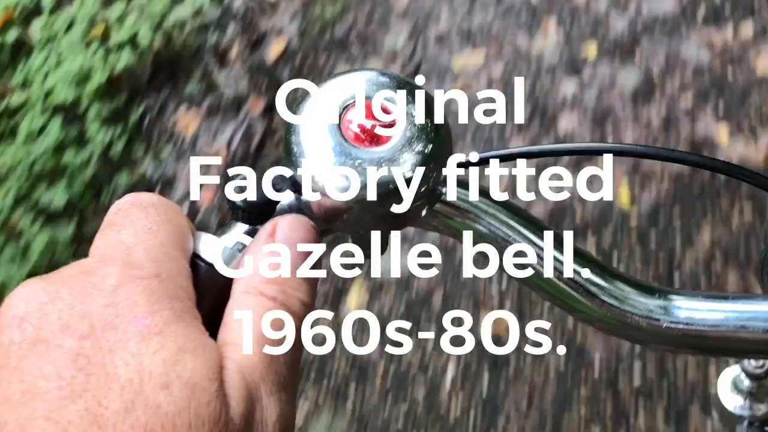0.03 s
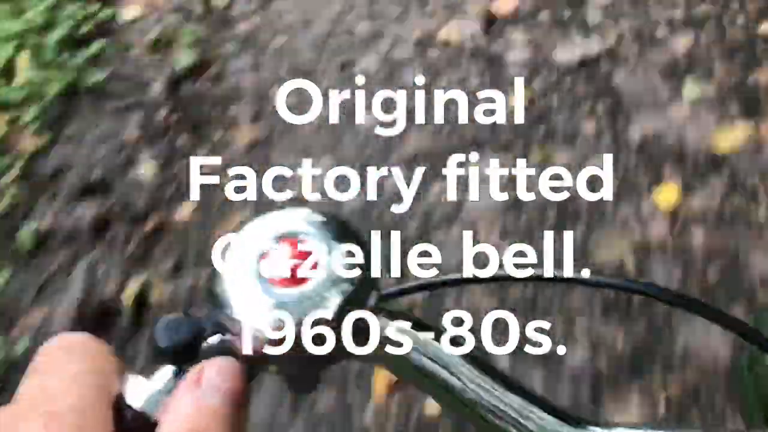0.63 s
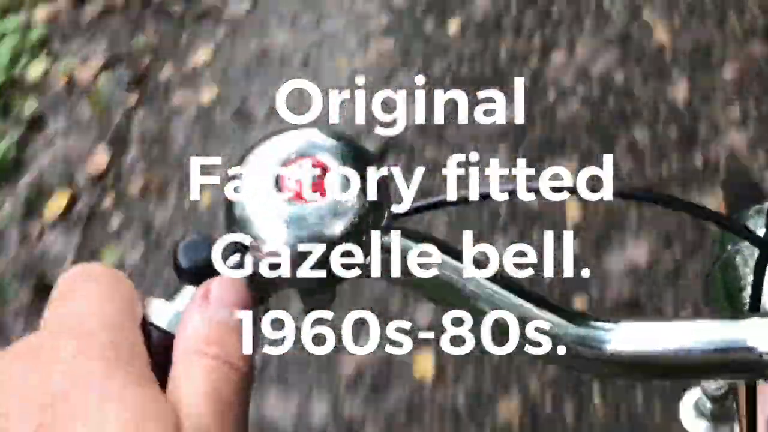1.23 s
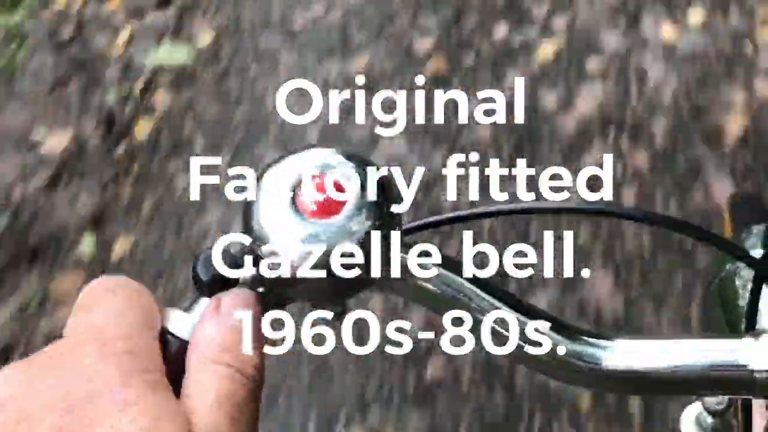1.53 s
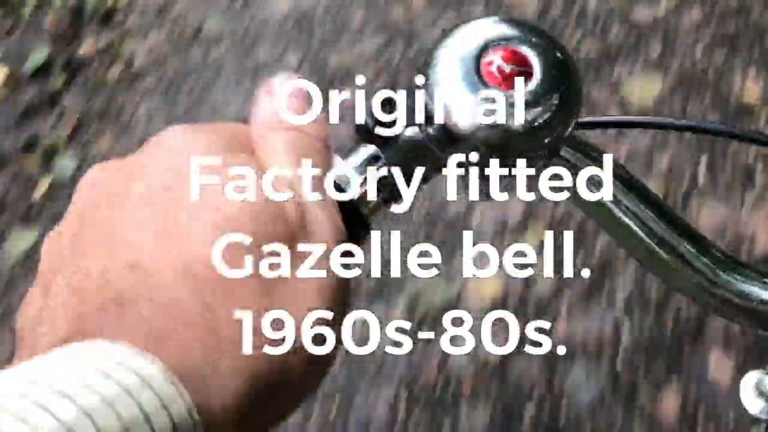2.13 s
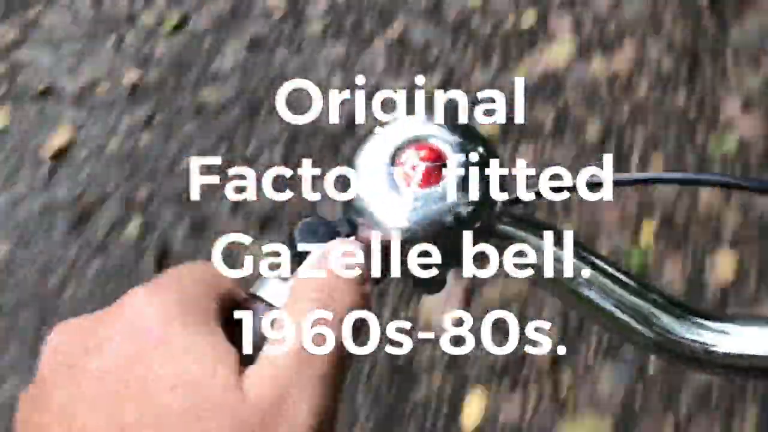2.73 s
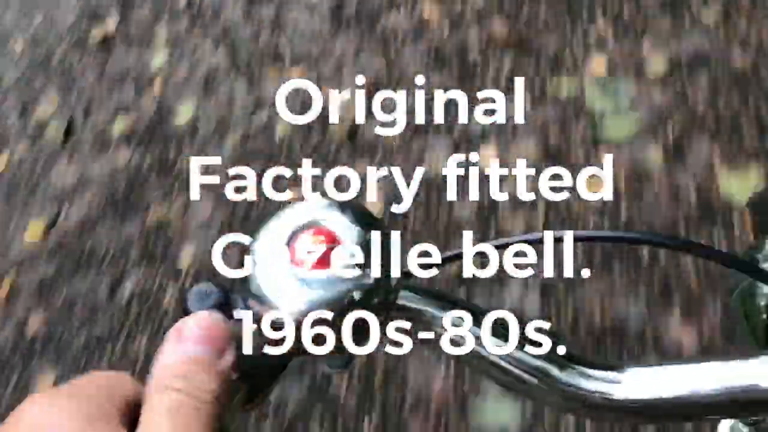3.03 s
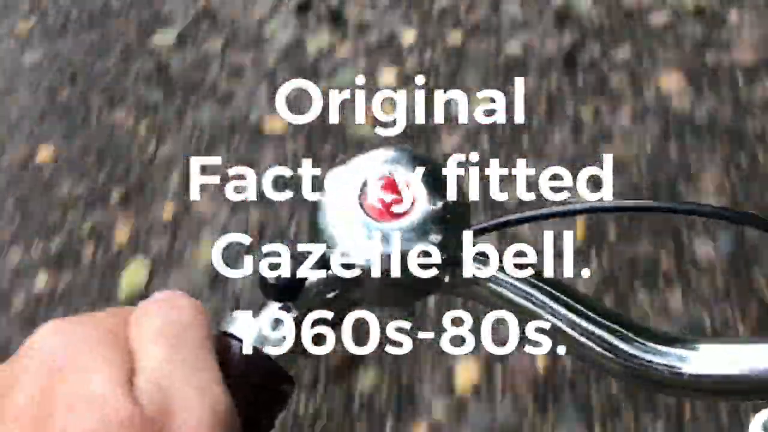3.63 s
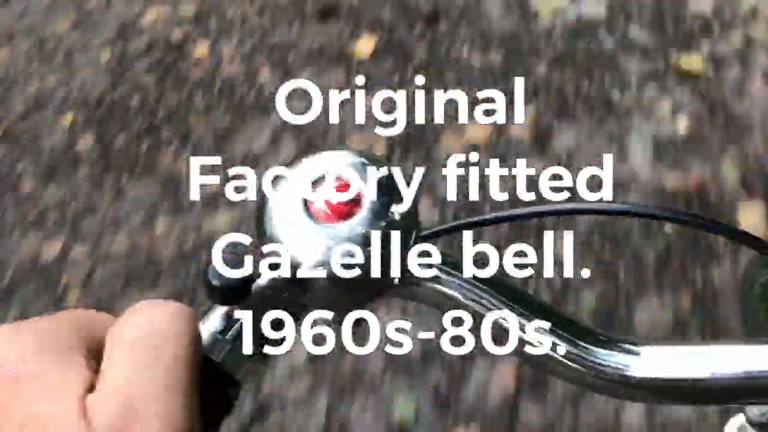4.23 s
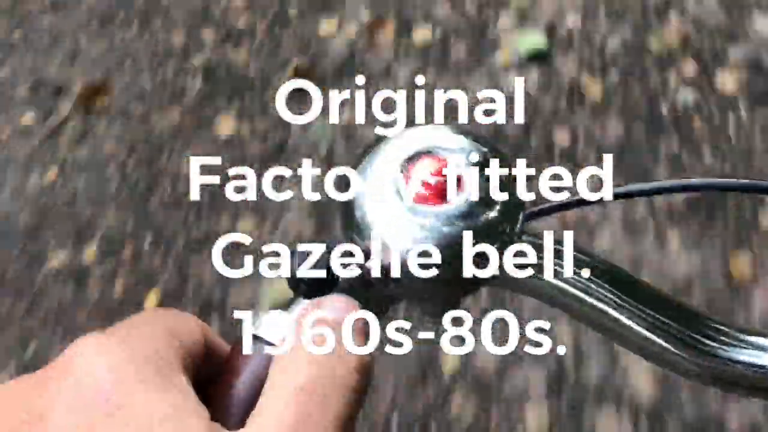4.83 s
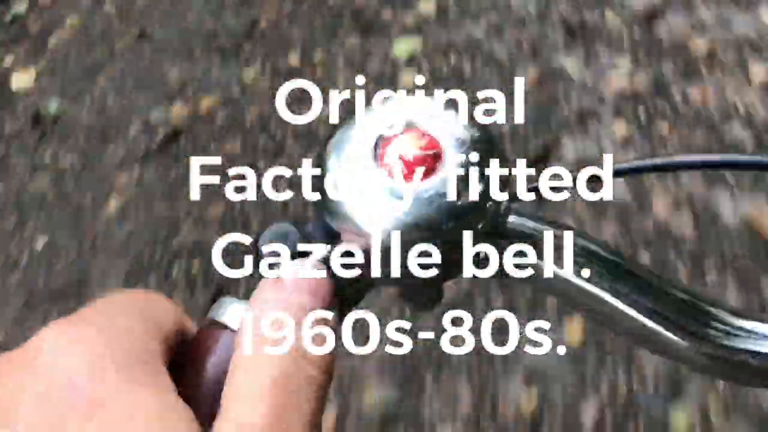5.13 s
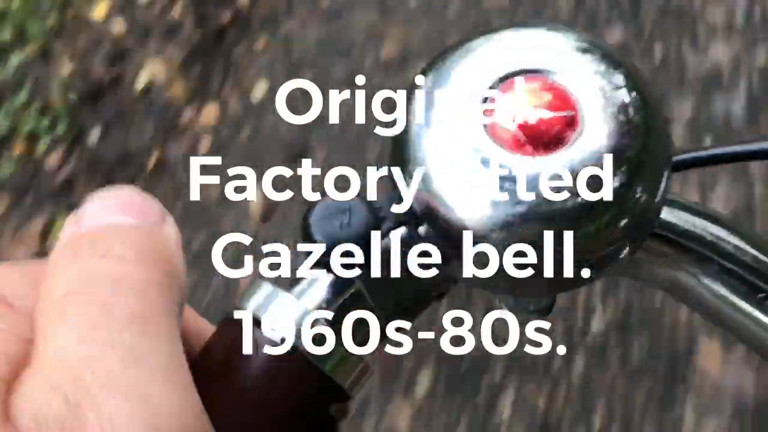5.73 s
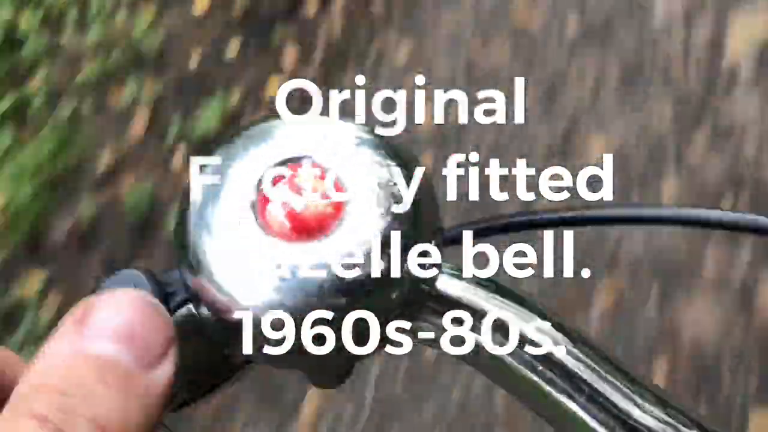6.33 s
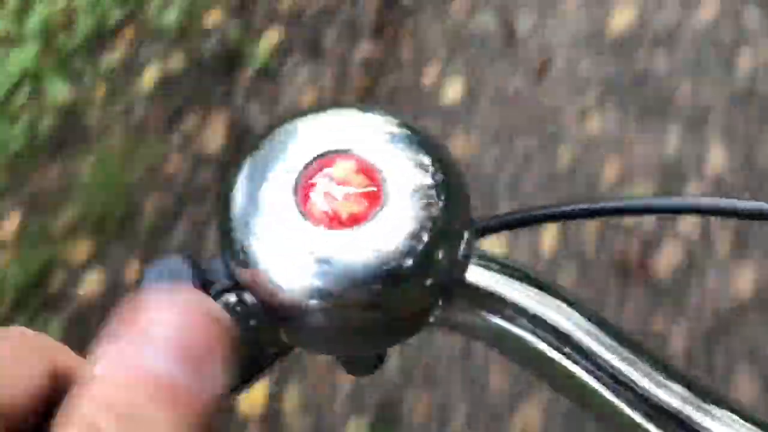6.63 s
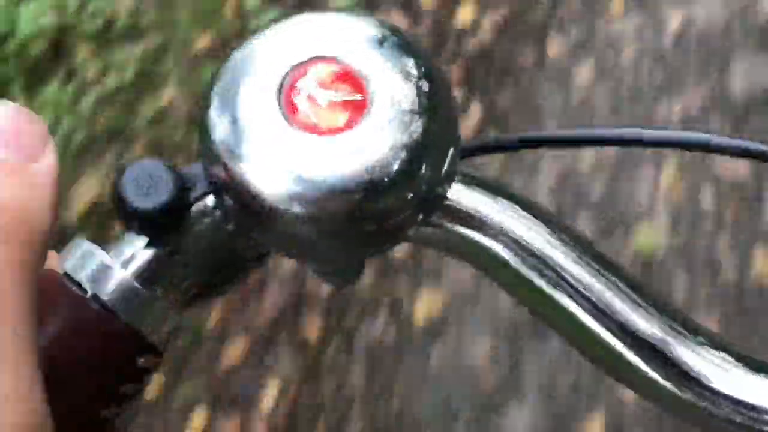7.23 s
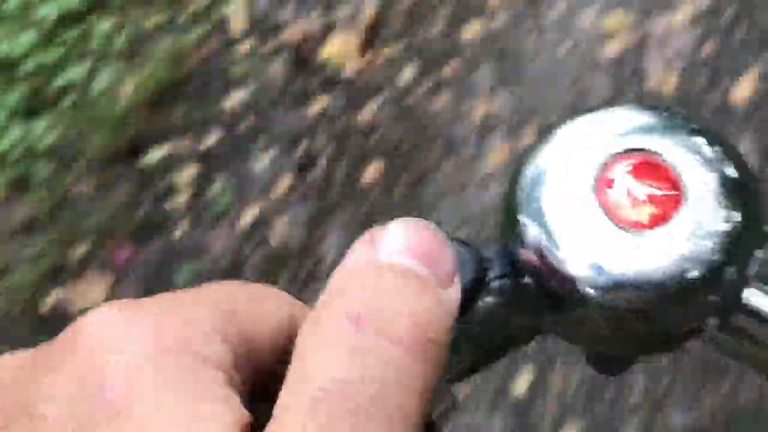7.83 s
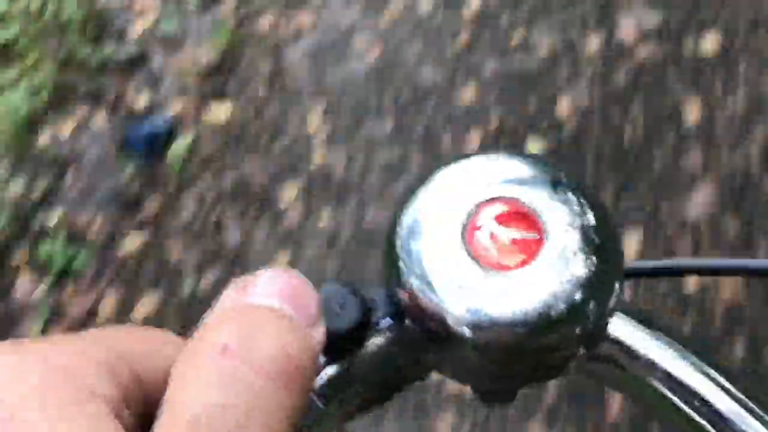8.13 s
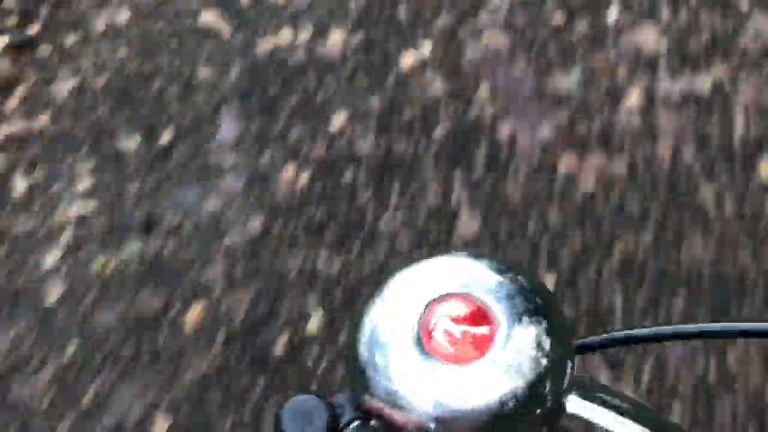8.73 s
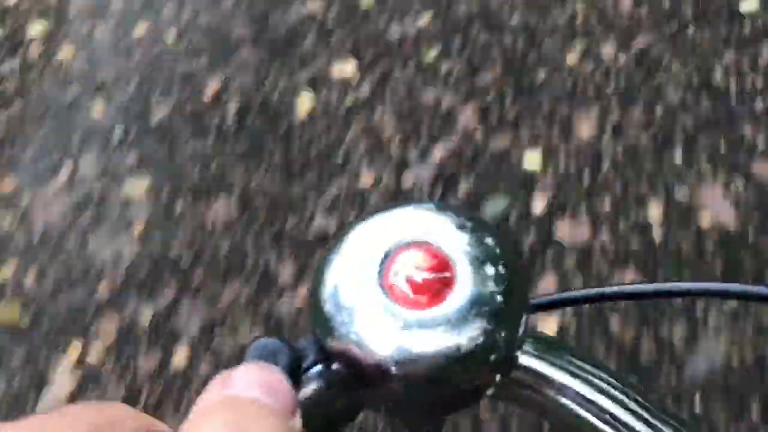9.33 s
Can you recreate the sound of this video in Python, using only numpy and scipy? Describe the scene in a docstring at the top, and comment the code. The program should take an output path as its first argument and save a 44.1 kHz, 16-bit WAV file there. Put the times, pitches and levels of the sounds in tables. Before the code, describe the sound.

Wind rumbles on a hand-held microphone outdoors as bicycle tyres crunch over grit and leaves and the bike clatters lightly. After about two seconds a close metal bell trills, then again a second later. Following a pause it rings once more and breaks into a longer run of strikes with lever clicks and thumps. The riding noise dips under each burst, and the bell's tone hangs on afterwards.

```python
"""A rotary bicycle bell, close up, thumbed in four bursts on a ride along a gritty, leaf-strewn path.
Gears fling loose washers against the steel dome, whose paired modes beat and ring on as it turns;
the lever knocks on its stops. Underneath, the tyres roar and crunch and the bike rattles.
Wind buffets the hand-held mono microphone, whose gain control ducks under the bell."""
import sys
import numpy as np
from scipy import signal
from scipy.fft import rfft, irfft
from scipy.io import wavfile
from scipy.ndimage import uniform_filter1d, minimum_filter1d

SR = 44100
rng = np.random.default_rng(int(sys.argv[2]) if len(sys.argv) > 2 else 0)


def unload_wav(signal):
    """Save mono or channel-first audio to the path in sys.argv[1] as 16-bit WAV at rate SR, clipped to [-1, 1]."""
    wavfile.write(
        sys.argv[1],
        SR,
        np.round(np.clip(np.atleast_2d(signal).T, -1, 1) * 32767).astype(np.int16),
    )


N = 418509

# a washer meets the dome: (time [s], crack [dB], ring [dB], brightness [dB])
STRIKES = [(2.13, -17, -4, 11.5), (2.158, -13.5, -1, 6), (2.211, -21, -6.5, 11), (2.239, -18, -5, 1.5),
           (3.0595, -16, -9, 10.5), (3.113, -9, -2.5, 0), (3.143, -20, -4, 4), (3.21, -17, -2, 8.5),
           (3.241, -16.5, -2, 3), (5.5761, -12, -2, 8), (5.599, -16.5, -2.5, -1), (5.696, -19, 2, 8),
           (5.723, -15.5, 3.5, 0), (6.599, -11, 5, 1), (6.709, -13, 2.5, -4), (6.7422, -14, 4.5, 1),
           (6.836, -16, -3, 0), (6.869, -18, -3.5, -6), (6.961, -13.5, -2, 7), (7.035, -10.5, -.5, 3),
           (7.0523, -11.5, 1.4, -4.5), (7.165, -17.5, -4.5, -8), (7.197, -18.5, 1, -2.5)]
# the path under the tyres: (time [s], grit crunch [dB], wet-leaf hiss [dB])
PATH = [(0.1, -48, -57), (0.42, -45.5, -50), (1.1, -46.5, -56), (1.8, -47, -54.5), (2.5, -52, -64),
        (2.85, -44, -49.5), (3.4, -41.5, -77), (3.8, -43, -55), (4.1, -41, -48.5), (4.7, -42, -46),
        (5.45, -42, -47.5), (5.9, -47, -53), (6.42, -42, -44), (7.3, -49.5, -56), (7.65, -44, -50.5),
        (8.3, -46.5, -54.5), (8.8, -49.5, -60), (9.45, -48.5, -60)]
# spectra of low roar, dry crunch and fine hiss: (frequency [Hz], relative density [dB])
ROAR = [(120, -3), (250, 0.5), (330, -2.5), (420, -3.5), (700, -2.5), (970, 1.5), (1250, -4), (1600, -7),
        (2100, -14.5), (3200, -25)]
CRUNCH = [(1200, -3.5), (2200, 1.5), (3000, 4), (3800, 1.5), (4700, 3), (6500, -2), (7800, -11.5),
          (10000, -26)]
HISS = [(4000, -9), (7000, -2.5), (9000, 0), (10400, -2), (11800, 1.5), (14000, 0.5), (15800, 3.5)]


def dome(build_s, judder, flutter, shake_db, settle_s):
    """Each washer blow gives the steel dome's modes a new amplitude and phase, from which they decay."""
    # families swell and choke together; slight asymmetry makes close pairs that beat:
    # (family [index], frequency [Hz], level within the family [dB], t60 [s])
    modes = [(0, 1151.5, -1.5, 13), (0, 1169, -6, 11), (1, 2302.5, -2, 7), (1, 2340.5, -4, 7),
             (1, 4081, -6, 4), (1, 5852, -13, 4), (2, 2927.5, 0, 6.5), (2, 2913, -13, 8), (2, 2896, -21, 6),
             (3, 5151.5, 0, 3.8), (3, 6320, -31, 2.5), (4, 7778.5, 0, 2.1), (4, 7696, -11, 2.1),
             (4, 5093, -18, 3), (4, 8048, -28, 1.8), (4, 8077, -26, 1.8), (5, 10803, 0, .9),
             (5, 10692, -17, .9), (5, 10756, -19, .9), (5, 10301, -31, 1.6), (6, 14214, 0, .42),
             (6, 14082, -7, .4), (6, 15553, -21, .5), (6, 12925, -32, 1), (6, 13733, -35, .8)]
    # families 0-4 swell and fade as the dome turns and the hand sways: (time [s], level before decay [dB])
    hum = [(2.15, -40), (2.41, -44), (3.32, -39), (4.23, -42.5), (6.57, -42), (7.4, -40.5), (7.75, -36.5),
           (8.2, -45), (8.65, -36), (9.25, -43.5)]
    overtone = [(2.15, -43.2), (2.54, -54), (3.19, -41.0), (3.84, -57), (7.09, -45.5), (7.48, -46.5)]
    low_note = [(2.15, -22), (2.28, -30), (2.54, -34), (2.67, -26), (3.06, -22), (3.32, -31), (4.49, -31.5),
                (5.14, -24.4), (6.05, -33), (6.18, -25), (6.44, -46), (6.57, -31.5), (7.03, -26),
                (7.2, -29.5), (8.95, -29.5), (9.23, -37), (9.45, -29.5)]
    middle_note = [(2.54, -24), (2.8, -27), (3.1, -22.5), (3.58, -15.5), (4.1, -25.5), (4.88, -22.5),
                   (5.66, -34.5), (5.75, -22.5), (6.05, -16), (6.18, -26.5), (6.44, -17.5), (6.75, -39),
                   (6.96, -27), (7.48, -27), (7.61, -37.5), (7.9, -26.5), (8.07, -36.5), (8.4, -30)]
    high_note = [(2.15, -25.4), (2.54, -12.5), (3.32, -19.5), (3.58, -15.1), (3.97, -24.5), (4.1, -21.5),
                 (5.71, -21.9), (5.79, -40), (5.92, -30.5), (6.57, -29), (6.61, -21), (6.83, -29),
                 (7.09, -16), (7.48, -31), (7.87, -22), (8.45, -30.5)]
    shimmer_db, sparkle_db = -16.5, -13.5   # the two top families die too soon to swell
    # a bright blow favours the top family: (gain per brightness [dB/dB]) by family
    brightness_share = [-0.3, -1.46, -0.11, -0.55, -0.017, 0.13, 0.98]
    # the resting thumb chokes all but the middle note: (gain [dB]) by family
    touch_db = [-18, -20, -25.5, -4, -32, -25, -25]
    touch_s, release_s = 2.851, 3.06
    strike_s, _, ring_db, bright_db = np.transpose(STRIKES)
    t, out = np.arange(N) / SR, np.zeros(N)
    touched = (t > touch_s) & (t < release_s)
    levels = [in_time(rows)[0] for rows in (hum, overtone, low_note, middle_note, high_note)]
    # the loose dome judders after a blow, high families most,
    # trembles on rough ground and flutters as it coasts
    shaken = np.minimum(bursts(strike_s, np.zeros(len(strike_s)), t60=settle_s), 1)
    tremble = from_db(in_time(PATH)[0] + shake_db)
    at_mic = []
    for family, level_db in enumerate(levels + [shimmer_db, sparkle_db]):
        shake = judder * shaken * (family + 2) + tremble
        waver = 1 + shake * (drift(54) + 1j * drift(33)) + flutter * (drift(12.5) + 1j * drift(9))
        waver_rms = np.sqrt(1 + 2 * shake ** 2 + 2 * flutter ** 2)
        choke = uniform_filter1d(from_db(touched * touch_db[family]), size=128)
        at_mic.append(from_db(level_db) * choke * waver / waver_rms)
    onsets = np.round(strike_s * SR).astype(int)
    first, lengths = onsets[0], np.diff(np.r_[onsets, N])
    age_s = t[first:] - np.repeat(onsets / SR, lengths)
    inertia = np.exp(-1 / (build_s * SR))
    for family, hz, db, t60 in modes:
        phases = np.exp(2j * np.pi * rng.random(len(onsets)))
        struck = from_db(ring_db + brightness_share[family] * bright_db + db) * phases
        decaying = np.repeat(struck, lengths) * from_db(-60 * age_s / t60)
        swing = signal.lfilter([1 - inertia], [1, -inertia], decaying)
        tone = swing * np.exp(2j * np.pi * hz * t[first:])
        out[first:] += np.sqrt(2) * (tone * at_mic[family][first:]).real
    return out


def gear_spin(run_on_s):
    """Envelope of the gears: each push or return of the lever spins them unevenly, then they coast."""
    # lever strokes: (time [s], length [s], level [dB])
    strokes = [(2.134, 0.12, -27), (3.09, 0.18, -31), (5.55, 0.068, -29), (5.676, 0.075, -24.5),
               (6.583, 0.046, -25.5), (6.695, .065, -28.5), (6.807, .07, -32.5), (6.952, 0.05, -30),
               (7.017, 0.068, -27), (7.15, .075, -31.5)]
    t, coast = np.arange(N) / SR, from_db(-60 / (run_on_s * SR))
    drive = sum(from_db(db) * ((t > s) & (t < s + length)) for s, length, db in strokes)
    return signal.lfilter([1 - coast], [1, -coast], drive + 1e-18) * from_db(3.9 * drift(55))


def clockwork(lag_s, jolt_db, clack_db, whirr_db, rumble_db):
    """Washers crack and jolt the housing just after; the gears clatter while they spin."""
    # the gear train takes up its slack with a clack: (time [s], level [dB])
    clacks = [(2.186, -8.5), (3.185, -17), (3.266, -19), (5.582, -11), (5.673, -15), (6.581, -22),
              (6.607, -22), (6.812, -21), (7.059, -21)]
    # steel on steel: (frequency [Hz], relative density [dB])
    tick_spectrum = [(1200, -22), (2000, -12.5), (3200, -10.5), (4200, 1), (5500, -8), (7000, -2.5),
                     (9000, -2.5), (12000, -2), (14500, 0.5), (16000, -9)]
    # resonances of the bell housing: (frequency [Hz], width [Hz], level [dB])
    housing = [(1382, 60, 4), (1610, 210, 1), (1790, 210, 2)]
    strike_s, crack_db, _, _ = np.transpose(STRIKES)
    clack_s, slack_db = np.transpose(clacks)
    spin = gear_spin(run_on_s=0.1)
    teeth = spin * grains(per_s=700, spread_db=1.0)
    cracks = bursts(strike_s, crack_db + 6.5, t60=0.0075) + bursts(strike_s, crack_db - 8.5, t60=0.094)
    ticks = bursts(clack_s, slack_db - 0.5, t60=0.021)
    impacts = np.hypot(cracks, ticks) * rng.standard_normal(N)
    steel = colour(impacts + from_db(whirr_db) * teeth, tick_spectrum)
    jolts = bursts(strike_s + lag_s, crack_db + jolt_db, t60=0.049)
    jolts += bursts(clack_s, slack_db + clack_db, t60=0.034)
    # a low rumble swells under each thumb stroke
    rumble = from_db(rumble_db) * colour(spin * rng.standard_normal(N), ROAR)
    return steel + rumble + resonate(jolts * rng.standard_normal(N) + teeth, housing)


def lever(thump_hz, thump_t60):
    """The lever's stop gives a short knock and a heavily damped swing of the handlebar."""
    # the lever hits a stop: (time [s], thump [dB], knock [dB])
    stops = [(2.238, -17, -36), (5.726, -29, -27), (6.606, -12.5, -29), (6.745, -8.5, -20),
             (6.964, -33, -28), (7.056, -5.5, -19), (7.199, -37, -29)]
    # handlebar modes: (frequency [Hz], level [dB], t60 [s])
    handlebar = [(150, 5.5, 0.037), (207, -1, 0.037), (316, -1, 0.022), (487, 2, 0.014), (596, -8, 0.02)]
    stop_s, thump_db, knock_db = np.transpose(stops)
    knock = sum(ring(kicks(stop_s, knock_db + db), hz, t60) for hz, db, t60 in handlebar)
    return ring(kicks(stop_s, thump_db), thump_hz, thump_t60) + knock


def rattles(top_db, jiggles_per_s, jiggle_db):
    """Bumps, and small jiggles between them, shake loose metal into a clatter; bumps ring the fittings."""
    # bumps in the path: (time [s], clatter [dB], ringing [dB])
    bumps = [(0.26, -37, -36.5), (.575, -53, -60), (.648, -39, -42), (0.768, -42, -41), (0.861, -39, -51),
             (0.999, -42, -41.5), (1.222, -41, -51), (1.254, -38, -43), (1.683, -40, -61),
             (1.916, -39.5, -63), (1.96, -42, -61), (3.63, -30.5, -39), (5.144, -47, -62),
             (6.434, -29.5, -50.5), (7.9, -40, -46), (8.2, -34.5, -38.5), (8.375, -41, -58),
             (9.026, -39.5, -57), (9.068, -39, -52), (9.333, -38.5, -57), (9.373, -42, -49)]
    # resonances of the metal fittings: (frequency [Hz], width [Hz], level [dB])
    fittings = [(2895, 85, -2.5), (4700, 24, -12), (4560, 9.7, 4.5), (6180, 33, 1.5), (7020, 60, 2.5),
                (8400, 48, -6), (12200, 87, -4.5), (13600, 40, -9), (14400, 110, -2.5)]
    bump_s, clatter_db, ring_db = np.transpose(bumps)
    contacts = grains(per_s=3000, spread_db=4.5)
    jiggle_s = np.flatnonzero(rng.random(N) < jiggles_per_s / SR) / SR
    flurry = (bursts(bump_s, clatter_db, t60=0.13) + bursts(jiggle_s, jiggle_db, t60=0.1)) * contacts
    clatter = colour(flurry, CRUNCH) + from_db(top_db) * colour(flurry, HISS)
    return clatter + resonate(bursts(bump_s, ring_db + 2.5, t60=0.26) * contacts, fittings)


def wind_and_tyres():
    """Gusts buffet the microphone; below it the tread roars and crushes clumps of grit and leaves."""
    # the ride: (time [s], wind [dB], tyre roar [dB])
    ride = [(0.1, -36.5, -40), (2.0, -40, -40), (2.25, -34.5, -40.5), (2.65, -45.5, -43.5),
            (3.4, -31.5, -36.5), (4.0, -40, -41.5), (5.4, -37.5, -40), (5.7, -35, -41), (6.3, -39, -38.5),
            (7.1, -41.5, -43.5), (7.5, -43, -44), (7.9, -43, -41), (8.8, -43, -42), (9.45, -39, -42.5)]
    # wind on the microphone: (frequency [Hz], relative density [dB])
    wind_spectrum = [(24, -30), (32, -12.5), (43, 0.5), (65, 0.5), (100, -3), (160, -9), (240, -20),
                     (450, -37)]
    wind_db, roar_db = in_time(ride)
    crunch_db, hiss_db = in_time(PATH)
    clumps, patches = drift(29), drift(3.6)
    gusts = from_db(wind_db - 1.0 + 1.43 * drift(11.4))
    wind = colour(gusts * rng.standard_normal(N), wind_spectrum)
    tread = from_db(roar_db + 0.5 * drift(13.0))
    roar = colour(tread * rng.standard_normal(N), ROAR)
    grit = from_db(crunch_db - 4.0 + 2.85 * clumps + 0.73 * patches)
    crunch = colour(grit * grains(per_s=7000, spread_db=4.0), CRUNCH)
    leaves = from_db(hiss_db + 1.8 + 2.96 * clumps + 2.9 * patches)
    hiss = colour(leaves * grains(per_s=13000, spread_db=4.5), HISS)
    return wind + roar + crunch + hiss


def from_db(db):
    """Decibels to gain."""
    return 10 ** (np.asarray(db) / 20)


def rms_one(x):
    """Scale to unit power."""
    return x / np.sqrt(np.mean(x ** 2) + 1e-20)


def in_time(rows):
    """Interpolate timed rows to one value per sample, for each column."""
    times, *columns = np.transpose(rows)
    return [np.interp(np.arange(N) / SR, times, column) for column in columns]


def drift(hz):
    """Random wander of spread 1, mostly slower than hz."""
    step, run_in = 40, 2000
    r = np.exp(-2 * np.pi * hz * step / SR)
    slow = signal.lfilter([1], [1, -2 * r, r * r], rng.standard_normal(N // step + run_in + 2))[run_in:]
    return np.interp(np.arange(N) / step, np.arange(len(slow)), rms_one(slow))


def grains(per_s, spread_db):
    """Random clicks of uneven size, unit power."""
    sizes = from_db(spread_db * np.minimum(rng.exponential(1, N), 4)) * rng.choice([-1, 1], N)
    return rms_one(sizes * (rng.random(N) < per_s / SR))


def kicks(times, levels_db):
    """One impulse for each contact."""
    out = np.zeros(N)
    out[np.round(times * SR).astype(int)] = from_db(levels_db)
    return out + 1e-18


def bursts(times, levels_db, t60):
    """An envelope that jumps at each contact and dies away."""
    return signal.lfilter([1], [1, -from_db(-60 / (t60 * SR))], kicks(times, levels_db))


def ring(x, hz, t60):
    """A unit impulse sets a sine of height 1 ringing."""
    r, w = from_db(-60 / (t60 * SR)), 2 * np.pi * hz / SR
    return signal.lfilter([0, np.sin(w)], [1, -2 * r * np.cos(w), r * r], x)


def resonate(x, modes):
    """Parallel resonances; white input keeps about its power."""
    out, power = 0, 0
    for k, (hz, width, db) in enumerate(modes):
        r = np.exp(-np.pi * width / SR)
        scale = (1 - r * r) / 2
        feedback = [1, -2 * r * np.cos(2 * np.pi * hz / SR), r * r]
        out = out + (-1) ** k * from_db(db) * signal.lfilter([scale, 0, -scale], feedback, x + 1e-18)
        power += scale * from_db(db) ** 2
    return out / np.sqrt(power)


def colour(x, spectrum):
    """Causal (minimum-phase) filter with the given spectrum; white input keeps its power."""
    hz, db = np.transpose(spectrum)
    size = 2 ** 13
    grid = np.maximum(np.fft.rfftfreq(size, 1 / SR), 1)
    octaves_outside = np.maximum(np.log2(hz[0] / grid), 0) + np.maximum(np.log2(grid / hz[-1]), 0)
    gain = rms_one(from_db(np.interp(np.log(grid), np.log(hz), db) - 20 * octaves_outside))
    cepstrum = irfft(np.log(gain + 1e-6))
    cepstrum[1:size // 2] *= 2
    cepstrum[size // 2 + 1:] = 0
    return signal.fftconvolve(x, irfft(np.exp(rfft(cepstrum))))[:N]


def scene():
    """The bell close by and the ride beneath it reach one microphone, the same on both channels."""
    bell = from_db(2.1) * dome(build_s=0.0025, judder=0.048, flutter=0.24, shake_db=27.5, settle_s=0.28)
    bell += clockwork(lag_s=.004, jolt_db=-9, clack_db=-1.5, whirr_db=-4, rumble_db=-10)
    bell += lever(thump_hz=80, thump_t60=0.054)
    mono = bell + wind_and_tyres() + rattles(top_db=-4, jiggles_per_s=4.1, jiggle_db=-44)
    return np.array([mono, mono])


def gain_control(x, threshold_db, depth_db, hold_s, release_db_per_s):
    """Loud sound turns the gain down at once; it is held, then creeps back."""
    level_db = 10 * np.log10(np.maximum(uniform_filter1d(x ** 2, size=220), 1e-12))
    over_db = np.clip(level_db - threshold_db, 0, depth_db)
    hold, look_ahead = 2 * int(hold_s * SR / 2) + 1, 130   # samples
    held_db = -minimum_filter1d(-over_db, size=hold, origin=hold // 2 - look_ahead)
    release_db = release_db_per_s * np.arange(N) / SR
    cut_db = np.maximum.accumulate(held_db + release_db) - release_db
    return from_db(-uniform_filter1d(cut_db, size=130))


def record(dry):
    """The recorder opens, ducks under the bell, limits the loudest swings and cuts the top."""
    start_s, ceiling, cutoff_hz = .083, .68, 15700
    ducked = dry * gain_control(dry[0], threshold_db=-21.5, depth_db=8.0, hold_s=0.15, release_db_per_s=23.5)
    safe_gain = np.minimum(ceiling / (np.abs(ducked[0]) + 1e-9), 1)
    limiter = uniform_filter1d(minimum_filter1d(safe_gain, size=220), size=220)
    live = ducked * limiter * (np.arange(N) / SR > start_s)
    return signal.sosfilt(signal.ellip(10, .2, 80, cutoff_hz, fs=SR, output="sos"), live)


dry = scene()
out = record(dry)
unload_wav(out)
```